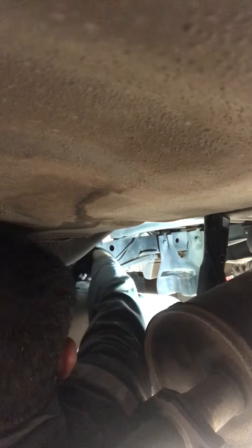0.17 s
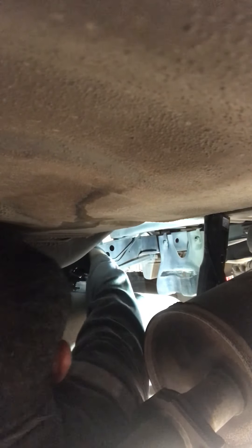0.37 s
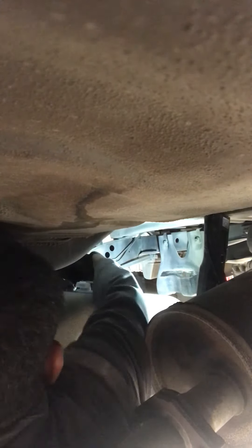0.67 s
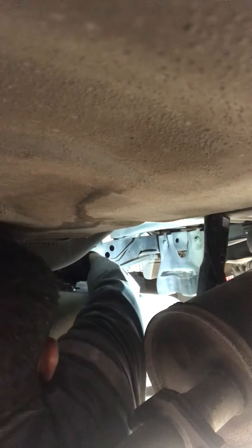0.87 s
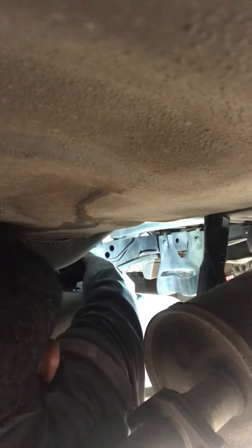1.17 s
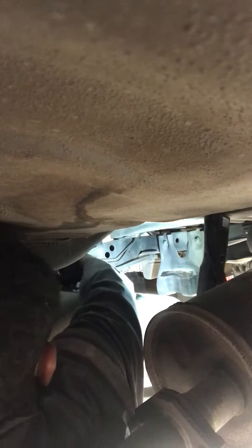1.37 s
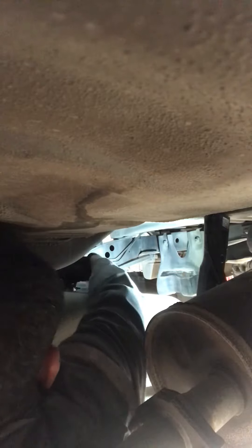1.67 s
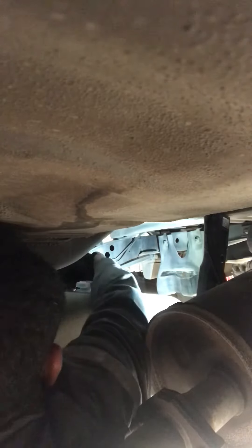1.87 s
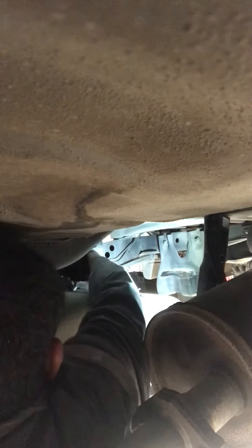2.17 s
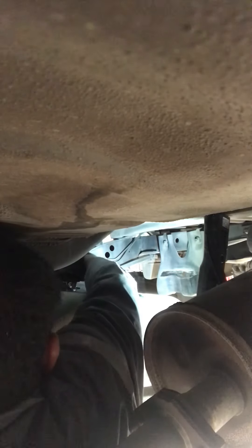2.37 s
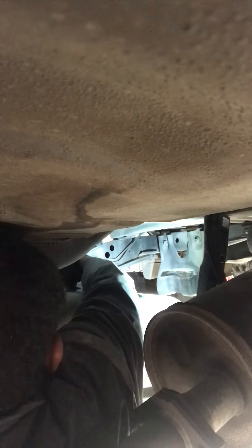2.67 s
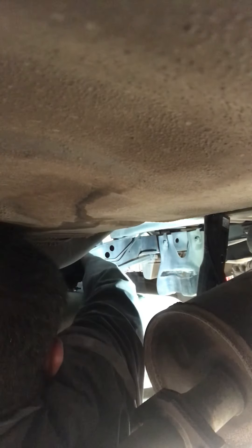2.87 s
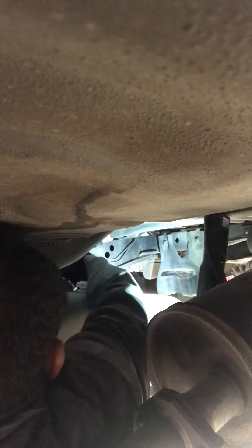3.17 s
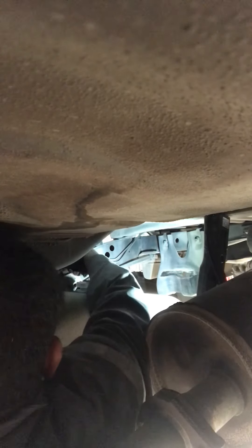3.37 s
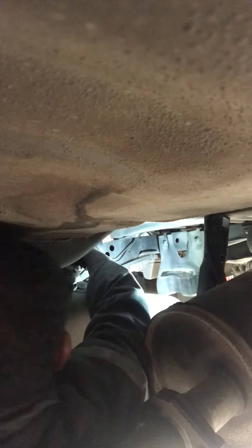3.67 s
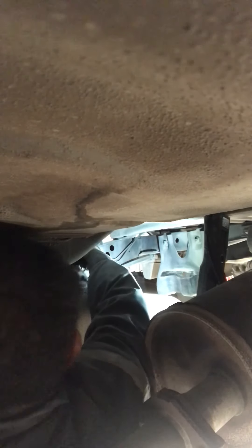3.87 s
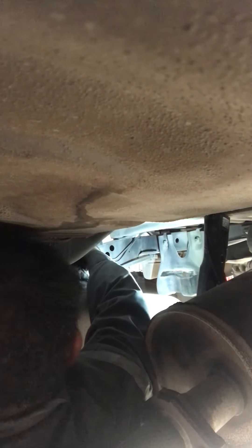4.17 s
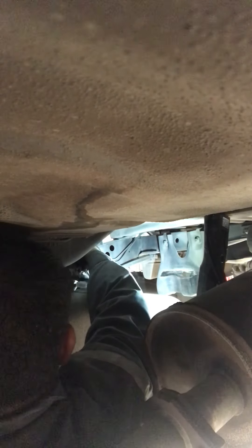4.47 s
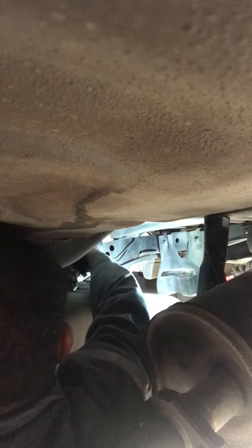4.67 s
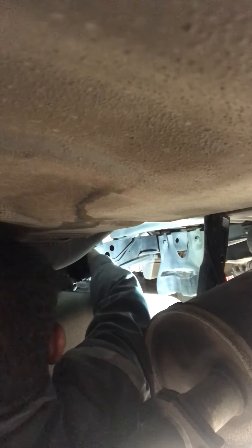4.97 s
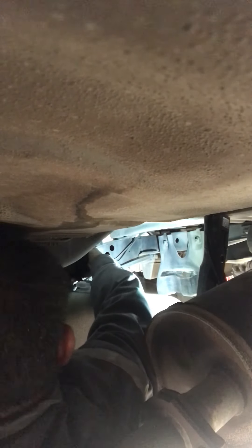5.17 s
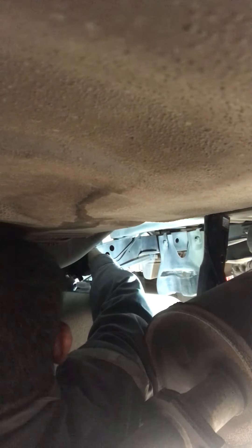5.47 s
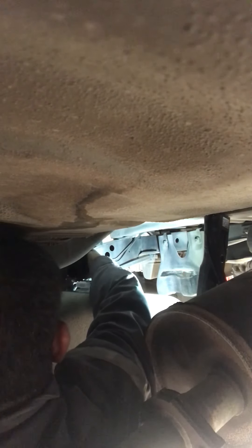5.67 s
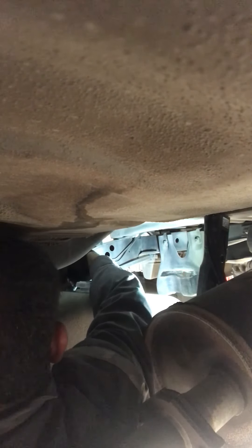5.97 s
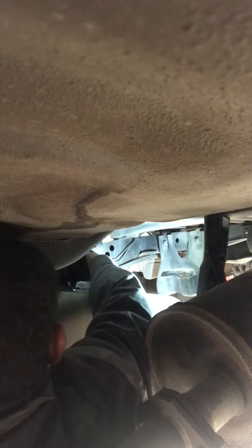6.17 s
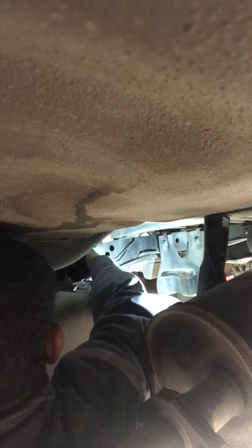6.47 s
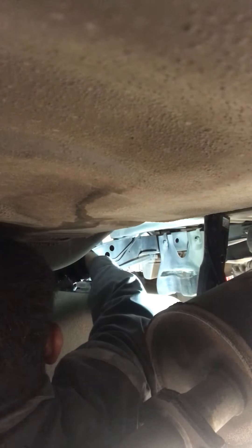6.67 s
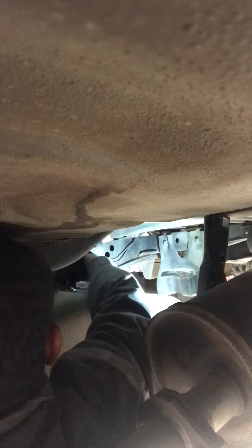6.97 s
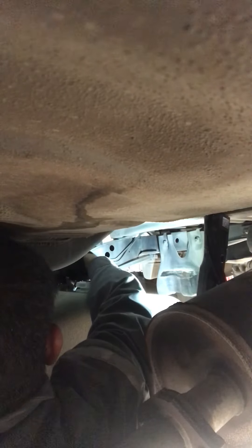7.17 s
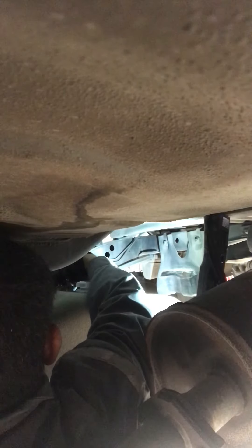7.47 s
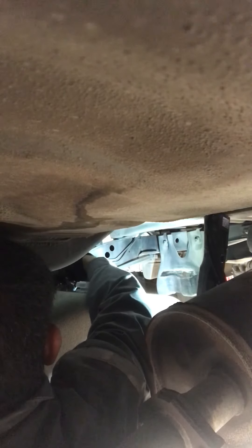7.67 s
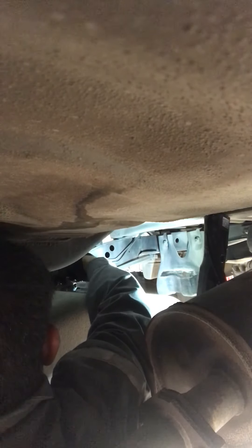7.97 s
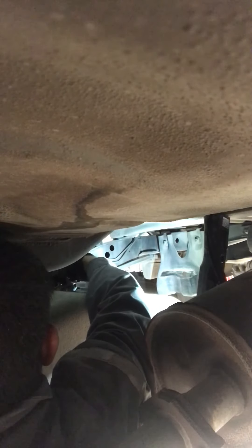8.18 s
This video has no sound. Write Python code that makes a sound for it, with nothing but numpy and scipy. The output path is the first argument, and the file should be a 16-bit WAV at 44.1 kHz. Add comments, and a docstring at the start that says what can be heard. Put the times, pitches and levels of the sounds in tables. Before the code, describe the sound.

Under a vehicle, sleeves brush softly and metal clacks twice over a droning motor, before compressed air blasts out and hisses to the end.

```python
"""Compressed air bursts out under a car in a workshop: shaped noise that swells, buffets nearby parts and hisses on.
Cavities whistle as narrow, gliding noise, and an edge adds a harder hiss; hollows and panels colour the air.
Before it come faint sleeve brushes, made of noise and ticks, and two knocks of metal, made of ringing modes,
clacks and thuds. Behind them a machine hums in wavering tones over the rumble, fan rush and faint hiss of a hall."""
import sys
import numpy as np
from scipy import signal
from scipy.fft import rfft, irfft, next_fast_len
from scipy.io import wavfile
from scipy.ndimage import uniform_filter1d

SR = 44100
rng = np.random.default_rng(int(sys.argv[2]) if len(sys.argv) > 2 else 0)


def pcm_store(signal):
    """Save signal as 16-bit PCM."""
    levels = np.round(np.clip(np.atleast_2d(signal), -1, 1) * 32767)
    wavfile.write(sys.argv[1], SR, levels.astype(np.int16).T)


N = 367794  # length in samples
TIME = np.arange(N) / SR  # seconds
JET_OPENS_S = 6.473


def jet(rush_db=-0.94, fizz_db=-2.5, flutter_db=0.62, fizz_flicker_db=0.2):
    """Turbulent air: the valve opens quickly, and the stronger the stream, the harder it buffets the parts nearby."""
    # course of the stream, before the trims of each layer: [time_s, level_db, fizz_over_level_db]
    stream_course = [(6.53, -35.5, -6), (7.08, -34, -9), (7.26, -32, -5.5), (7.365, -31.5, -8),
                     (7.39, -29.5, 1.5), (7.5, -28, 3.5), (7.6, -28, 4.5), (7.73, -27, -2.5),
                     (7.87, -29, 3.5), (8.04, -29, -4.5), (8.33, -29.2, -1)]
    # spectrum of the rushing stream: [pitch_hz, density_db (per Hz)]
    rush_spectrum = [(300, -52), (750, -8), (1100, -1), (1800, 1.5), (2400, 1), (3200, -3), (4200, -3.5),
                     (5000, -3), (5700, -1.5), (6800, 1.5), (7700, -2), (9000, -1.5), (10500, -6.5),
                     (16000, -17)]
    # spectrum of the fizz at the nozzle: [pitch_hz, density_db (per Hz)]
    fizz_spectrum = [(3000, -25), (7000, -5), (8200, -4.5), (9100, 0), (9800, -1), (10400, -6),
                     (11300, -9.5), (12300, -11.5), (14000, -16.5), (16000, -15)]
    # spectrum of air striking the parts: [pitch_hz, density_db (per Hz)]
    buffet_spectrum = [(120, -11), (230, 5.5), (380, 2), (560, 3.5), (740, -9), (1300, -27), (2200, -23),
                       (4000, -29)]
    rise_s, full_stream_db = 0.048, -28
    full_buffet_db, buffet_growth = -38, 3.8  # at full stream; dB of buffeting per dB of stream

    time_s, level_points, fizz_points = np.transpose(stream_course)
    level_db = np.interp(TIME, time_s, level_points)
    fizz_over_db = np.interp(TIME, time_s, fizz_points)
    valve = np.clip((TIME - JET_OPENS_S) / rise_s, 0, 1)
    cracked = np.minimum(2 * valve, 1)  # a half open valve already fizzes fully

    rush = valve * gain_of(level_db + rush_db) * noise(rush_spectrum)
    fizz_level_db = level_db + fizz_over_db + fizz_db + fizz_flicker_db * drift(9.7)
    fizz = gain_of(fizz_level_db) * noise(fizz_spectrum)
    buffet_level_db = full_buffet_db + buffet_growth * (level_db - full_stream_db)
    buffet = gain_of(buffet_level_db) * noise(buffet_spectrum)
    layers = rush + fizz + buffet + edge_hiss() + cavities()
    return cracked * gain_of(flutter_db * drift(40)) * layers


def edge_hiss(edge_db=-34, from_s=7.61, full_s=7.7):
    """Late in the blast the stream turns onto an edge, which cuts the air and adds a harder hiss."""
    # spectrum of air cut by an edge: [pitch_hz, density_db (per Hz)]
    edge_spectrum = [(1200, -2), (2600, -15), (3300, 4.5), (4500, -3.5), (5800, 7), (7800, -3), (9500, -18),
                     (14000, -22)]
    aimed = np.clip((TIME - from_s) / (full_s - from_s), 0, 1)
    return aimed * gain_of(edge_db) * noise(edge_spectrum)


def cavities(sing_db=-1.5):
    """Each cavity under the stream gives a fuzzy whistle that glides as the nozzle passes."""
    # cavities crossed by the stream, levels before the common trim:
    # [peak_s, half_length_s, pitch_hz, glide_hz_per_s, width_hz, level_db]
    whistles = [(6.82, .13, 6840, 146, 70, -52), (6.85, 0.13, 6500, -45, 58, -53),
                (7.05, 0.33, 1793, 60.5, 80, -45), (7.22, 0.26, 4700, -330, 80, -49.5),
                (7.25, .22, 6870, 99, 220, -42), (7.45, 0.18, 2073, 120.5, 30, -45),
                (7.56, 0.096, 4385, -600, 70, -45), (7.56, .12, 9000, -150, 70, -42),
                (7.74, 0.13, 2200, 86.5, 70, -41), (7.8, 0.69, 2490, 14, 30, -50),
                (8.17, .1, 8450, 198, 91, -44)]
    out = np.zeros(N)
    for peak_s, half_s, hz, glide, width, db in whistles:
        crossing = np.exp(-((TIME - peak_s) / half_s) ** 4)
        gliding_hz = hz + glide * (TIME - peak_s)
        out += gain_of(db + sing_db) * crossing * narrow(gliding_hz, width)
    return out


def eddies(x, eddy_db=2.2, bins=5, frames=4):
    """Small, shifting eddies favour narrow bands of the stream for a moment each."""
    spectrum = signal.stft(x, nperseg=1024, noverlap=768)[2]
    patches = rng.standard_normal(spectrum.shape)
    patches = uniform_filter1d(patches, bins, 0)
    patches = evened(uniform_filter1d(patches, frames, 1))
    return signal.istft(spectrum * gain_of(eddy_db * patches), nperseg=1024, noverlap=768)[1][:N]


def engine_bay(x):
    """Hollows colour the sound; echoes from the panels comb it, and the comb slides as the nozzle moves."""
    # hollows of the engine bay: [pitch_hz, width_hz, lift_db]
    hollows = [(1320, 64, 4), (1830, 130, 2), (2200, 120, 2), (2390, 70, 3), (4620, 320, 4),
               (4880, 150, -3.5), (7460, 200, -3.5), (9500, 200, 0.5), (10300, 350, -6)]
    # panels near the nozzle, delay as the jet opens: [delay_ms, strength_factor, slide_ms_per_s]
    panels = [(1.3, 0.032, 0.1), (2.9, 0.05, -.1), (4.7, 0.19, 0.078), (7.9, 0.061, -0.12),
              (12.3, 0.11, 0.058), (17, 0.096, -.05)]
    hz = np.fft.rfftfreq(N, 1 / SR)
    lift_db = sum(db / (1 + (2 * (hz - f) / width) ** 2) for f, width, db in hollows)
    x = irfft(rfft(x) * gain_of(lift_db), N)
    out = x.copy()
    for ms, strength, slide in panels:
        delay = (ms + slide * (TIME - JET_OPENS_S)) * SR / 1000  # samples
        out += strength * np.interp(np.arange(N) - delay, np.arange(N), x, left=0)
    return out


def sleeve(flutter_db=1.1, catches_per_s=170, catch_db=-8):
    """Each stroke of cloth builds to a point and slips off with a fluttering hiss; its threads catch in tiny ticks."""
    # strokes along the parts: [peak_s, level_db, rise_s, fall_s]
    strokes = [(.44, -48, .075, .075), (.55, -43.5, .04, .045), (.68, -50.5, .02, .025),
               (.755, -41, .03, .04), (.825, -49, .02, .04), (1.48, -53, .022, .035),
               (3.372, -57, .012, .04), (3.735, -49.5, .035, .045), (.96, -58, .02, .02),
               (2.28, -51, .06, .09), (3.66, -52.5, .06, .03), (4.76, -60.5, .1, .12)]
    # spectrum of brushing cloth: [pitch_hz, density_db (per Hz)]
    cloth_spectrum = [(500, 7.5), (1100, 17), (1900, 15), (2600, 6.5), (3400, -3.5), (3950, -1.5),
                      (4700, -4), (5300, -1), (6600, 2), (8100, -5.5), (8700, -6.5), (10500, -12.5),
                      (12400, -11), (16000, -17.5)]
    power = np.zeros(N)
    for peak_s, db, rise_s, fall_s in strokes:
        distance = np.maximum((peak_s - TIME) / rise_s, (TIME - peak_s) / fall_s)
        power += gain_of(db) ** 2 * np.exp(-distance)
    ticks = rng.uniform(-1.06, 1, N) * (rng.random(N) < catches_per_s / SR)
    catches = coloured(ticks, cloth_spectrum)
    slide = gain_of(flutter_db * drift(40)) * noise(cloth_spectrum)
    return np.sqrt(power) * (slide + gain_of(catch_db) * catches)


def knocks(clack_db=-8, thud_t60=0.062):
    """Each blow scatters a short clack, thuds into the panel behind and rings the part's modes in random phase."""
    # contacts within the knocks; clack and ring take level_db, the thud has a level of its own:
    # [start_s, level_db, low_corner_hz, high_corner_hz, ring_db, clack_t60_s, thud_db]
    contacts = [(2.657, -15, 550, 2500, -12, .028, -35), (2.6612, -32, 200, 900, -12, .04, -33.5),
                (3.9438, -20, 600, 9000, -8, .03, -40), (3.9448, -9.5, 200, 8000, -8, .032, -36),
                (3.951, -19, 400, 7500, -14, .045, -33.5), (3.9635, -19, 149, 1500, -12, .04, -27.5),
                (3.975, -19, 1900, 4600, -8, .06, -40), (3.9835, -25, 1900, 4200, -7, .05, -40)]
    # modes of the struck part: [pitch_hz, level_db, t60_s]
    part_modes = [(377, -13, 0.16), (1023, -8.5, 0.055), (1255, -7.5, 0.06), (3770, -5, 0.045),
                  (3930, -19, .08), (430, -12, 0.094), (618, -14, 0.15), (1150, -5, 0.04),
                  (1500, -10.5, 0.05), (2245, -13, 0.06), (2514, -11, 0.06), (2632, -16, 0.08),
                  (4170, -14, .05), (4608, -21, .06), (5206, -23, .06), (5850, -18.5, 0.05)]
    # spectrum of the clack: [pitch_hz, density_db (per Hz)]
    clack_spectrum = [(200, 12), (450, -10), (800, -9.5), (1250, 7), (1850, -7), (2400, -3), (3100, -10),
                      (3900, -13), (4900, -22), (6500, -11), (8500, -26.5), (15000, -40)]
    # spectrum of the dull panel thud: [pitch_hz, density_db (per Hz)]
    thud_spectrum = [(150, -6), (380, 2), (580, 2.5), (760, -10), (1250, -2), (1600, -14), (3000, -24),
                     (5500, -48)]
    out = np.zeros(N)
    t = np.arange(SR // 2) / SR
    onset = 1 - np.exp(-t / 0.0004)
    for start_s, db, low_hz, high_hz, ring_db, clack_t60, thud_db in contacts:
        ring = np.zeros(len(t))
        for hz, mode_db, t60 in part_modes:
            ring += gain_of(mode_db - 60 * t / t60) * np.sin(2 * np.pi * (hz * t + rng.random()))
        clack = coloured(rng.standard_normal(len(t)), clack_spectrum)
        clack *= gain_of(clack_db - 60 * t / clack_t60)
        thud = coloured(rng.standard_normal(len(t)), thud_spectrum)
        thud *= gain_of(thud_db - 60 * t / thud_t60)
        blow = onset * (gain_of(ring_db) * ring + clack)
        add(out, start_s, gain_of(db) * touch(blow, low_hz, high_hz) + onset * thud)
    return out


def touch(x, low_hz, high_hz, order=3):
    """A soft contact loses treble, a light one loses bass."""
    x = signal.lfilter(*signal.butter(order, high_hz, fs=SR), x)
    return signal.lfilter(*signal.butter(2, low_hz, "high", fs=SR), x)


def room(x, wet_db=-11, t60=0.19, dull_hz=1200):
    """The space under the car answers with a weak, dull tail of decaying noise."""
    t = np.arange(SR) / SR
    smoothing = np.exp(-2 * np.pi * dull_hz / SR)
    tail = signal.lfilter([1 - smoothing], [1, -smoothing], rng.standard_normal(SR))
    tail *= gain_of(-60 * t / t60)
    return x + gain_of(wet_db) * signal.fftconvolve(x, tail / np.linalg.norm(tail))[:N]


def machine(hum_hz=169.75, octave_db=0.17, waver_rad=0.16, flutter_db=0.3, octave_wander=0.32):
    """A motor's tone and its octave swell and fade; weaker tones waver by chance in the hall."""
    # swells of the main tone, before its flutter: [time_s, level_db]
    hum_course = [(0.0, -46), (0.13, -32), (.3, -31), (.55, -36), (.74, -30), (1.15, -36.5), (1.34, -45),
                  (1.6, -36.5), (2.0, -41), (2.44, -34.5), (2.6, -45), (2.8, -30.5), (3.1, -35), (3.7, -38),
                  (4.0, -32), (4.42, -37.5), (4.55, -40.5), (4.7, -33), (4.9, -41.5), (5.05, -33),
                  (5.36, -28.5), (5.78, -45), (6.4, -34.5), (6.7, -30), (7.04, -33), (7.14, -54),
                  (7.8, -43.5), (7.96, -32), (8.32, -43)]
    # swells of its octave, before the octave trim: [time_s, level_db]
    octave_course = [(0, -55), (.25, -48), (.45, -59.5), (1.1, -47), (1.45, -52.5), (1.7, -45.5),
                     (1.95, -55.5), (2.25, -59.5), (2.5, -38), (2.7, -51), (3.35, -51.5), (4.3, -53.5),
                     (4.75, -50.5), (5.45, -54), (5.9, -48), (6.4, -53.5), (7.25, -57), (8.0, -42),
                     (8.33, -50)]
    # weaker machine tones: [pitch_hz, level_db, width_hz]
    weak_tones = [(119.2, -41.5, 5.9), (142.7, -41, 13), (196.5, -48, 12.4), (261.3, -54, 6.8),
                  (511, -56.5, 18), (4110, -76, 93), (13450, -90, 300)]
    phase = 2 * np.pi * hum_hz * TIME + waver_rad * drift(1.9)
    hum_level_db = np.interp(TIME, *np.transpose(hum_course)) + flutter_db * drift(6.2)
    out = gain_of(hum_level_db) * evened(np.sin(phase))

    wander = 1 + octave_wander * (drift(4) + 1j * drift(14))  # strength and phase stray
    octave = (wander * np.exp(2j * phase)).real
    octave_level_db = np.interp(TIME, *np.transpose(octave_course)) + octave_db
    out += gain_of(octave_level_db) * evened(octave)
    return out + sum(gain_of(db) * narrow(hz, width) for hz, db, width in weak_tones)


def hall(rumble_db=-34.5, fans_db=-47.0, swell_db=0.33, hiss_db=-68.8, hiss_waver_db=0.5):
    """Rumble of the machines, the rush of their fans and a faint, nearly steady hiss."""
    # spectrum of the rumble: [pitch_hz, density_db (per Hz)]
    rumble_spectrum = [(15, -30), (28, -20), (42, -5), (58, 0), (76, 1), (92, -5.5), (135, 0.5),
                       (195, -1.5), (225, -9), (295, -14), (500, -18.5), (600, -17.5), (760, -36),
                       (1500, -63)]
    # spectrum of the fans: [pitch_hz, density_db (per Hz)]
    fan_spectrum = [(400, -7), (750, -2), (930, 2.5), (1150, -0.5), (1400, 0.5), (2000, -5), (2700, -12.5),
                    (4000, -23), (5000, -32.5)]
    # spectrum of the faint treble hiss: [pitch_hz, density_db (per Hz)]
    hiss_spectrum = [(2500, -9), (4000, -3.5), (4950, -4.5), (5500, -3.5), (6500, 0), (8500, -9.5),
                     (10400, -15.5), (11800, -12.5), (13500, -13), (16000, -23)]
    # course of the hiss around its base level: [time_s, offset_db]
    hiss_course = [(0, -1), (1.7, 0.8), (2.0, 2), (2.55, -1.5), (2.95, 3), (3.25, -0.5), (4.3, -1),
                   (4.8, 0.5), (5.6, -1.5), (6.4, 0)]
    rumble = gain_of(rumble_db) * noise(rumble_spectrum)
    hiss_level_db = hiss_db + np.interp(TIME, *np.transpose(hiss_course)) + hiss_waver_db * drift(8)
    hiss = gain_of(hiss_level_db) * noise(hiss_spectrum)
    fans = gain_of(fans_db + swell_db * drift(2.8)) * noise(fan_spectrum)
    return rumble + underbody(hiss + fans)


def underbody(x, echo_db=-12, count=40):
    """Many small reflections between floor and car put a fine, fixed ripple on the sound."""
    # span of the reflection delays under the car: [shortest_s, longest_s]
    delay_span = (.004, .03)
    taps = np.zeros(SR // 10)
    at = np.clip(rng.uniform(*delay_span, count) * SR, 1, len(taps) - 1).astype(int)
    taps[at] = gain_of(echo_db) * rng.choice([-1., 1.], count) / np.sqrt(count)
    taps[0] = 1  # direct sound
    return signal.oaconvolve(x, taps / np.linalg.norm(taps))[:N]


def gain_of(db):
    """Decibels to a factor."""
    return 10 ** (np.asarray(db) / 20)


def evened(x):
    """Scales to rms 1."""
    return x / np.sqrt(np.mean(abs(x) ** 2) + 1e-20)


def coloured(x, points):
    """Weights x by a spectrum of (Hz, dB) points, falling away beyond the last, at rms 1."""
    f, db = np.transpose(points)
    hz = np.fft.rfftfreq(len(x), 1 / SR) + 1  # keeps the logarithm finite
    gain = gain_of(np.interp(np.log(hz), np.log(f), db))
    gain /= np.maximum(hz / f[-1], 1) ** 2
    return evened(irfft(rfft(x) * gain, len(x)))


def noise(points):
    """Steady noise of a given spectrum, at rms 1."""
    return coloured(rng.standard_normal(N), points)


def drift(rate_hz):
    """Slow random wander of about rms 1, up to about the given rate."""
    size = next_fast_len(N, True)
    hz = np.fft.rfftfreq(size, 1 / SR)
    spectrum = rfft(rng.standard_normal(size)) / (1 + (hz / rate_hz) ** 2)
    return evened(irfft(spectrum, size)[:N])


def narrow(hz, width):
    """Noise in one resonance, whose centre may move, at rms 1."""
    wander = drift(width / 2) + 1j * drift(width / 2)
    phase = 2 * np.pi * np.cumsum(hz * np.ones(N)) / SR
    return evened((wander * np.exp(1j * phase)).real)


def add(mix, s, sound):
    """Lays a sound into the mix at time s in seconds."""
    part = mix[round(s * SR):][:len(sound)]
    part += sound[:len(part)]


def scene():
    """All sources reach one microphone, alike in both channels."""
    air_and_cloth = engine_bay(eddies(jet()) + sleeve())
    mono = air_and_cloth + room(knocks()) + machine() + hall()
    return np.array([mono, mono])


def record(dry, edge_hz=15740):
    """The recorder's band limit: a steep low-pass."""
    lowpass = signal.firwin(801, edge_hz, window=("kaiser", 9), fs=SR)
    return signal.oaconvolve(dry, lowpass[None], "same")


dry = scene()
out = record(dry)
pcm_store(out)
```